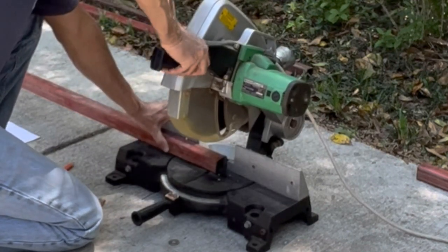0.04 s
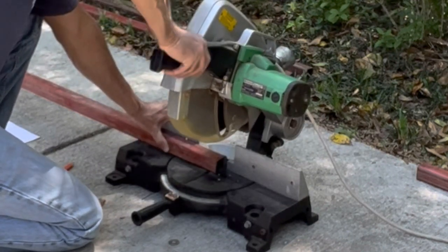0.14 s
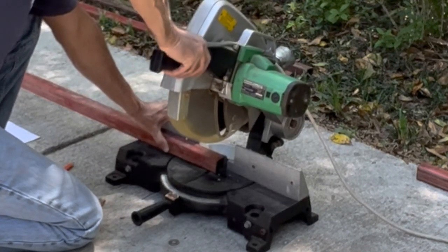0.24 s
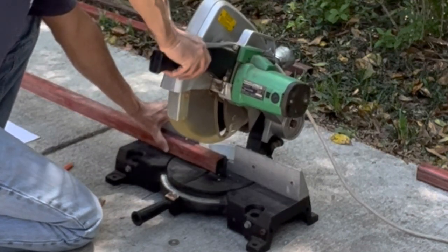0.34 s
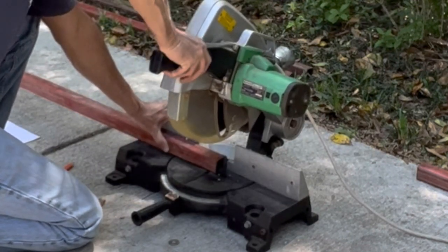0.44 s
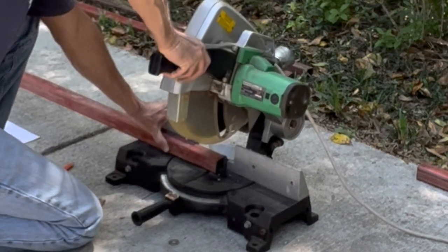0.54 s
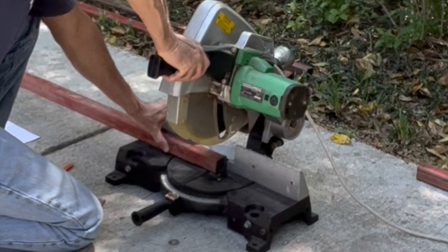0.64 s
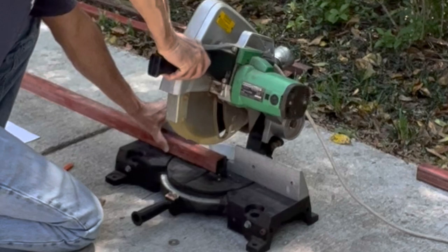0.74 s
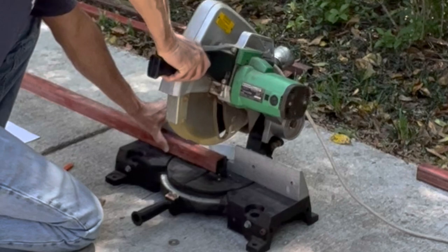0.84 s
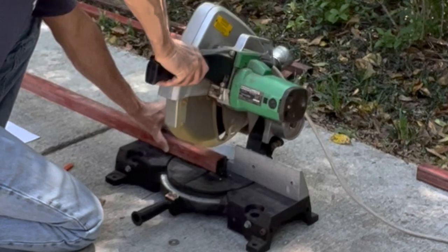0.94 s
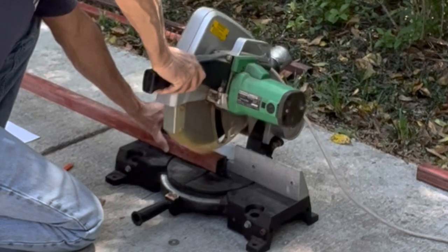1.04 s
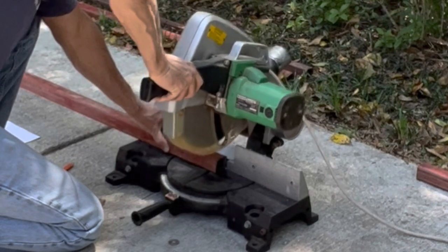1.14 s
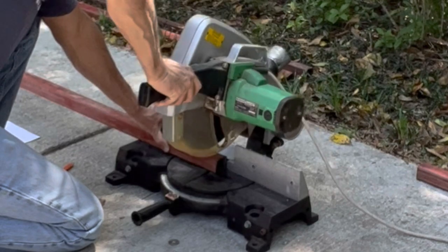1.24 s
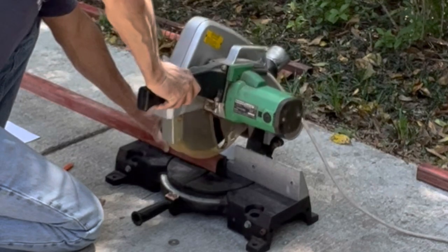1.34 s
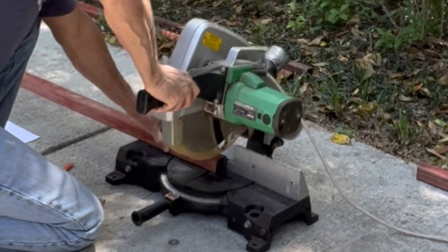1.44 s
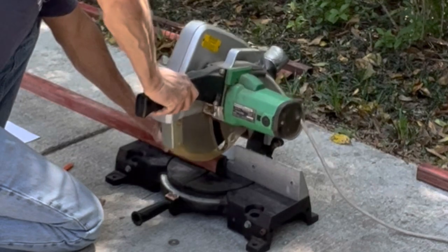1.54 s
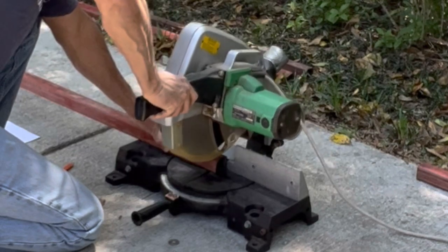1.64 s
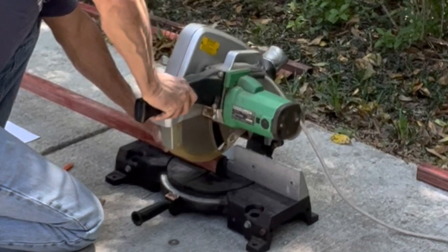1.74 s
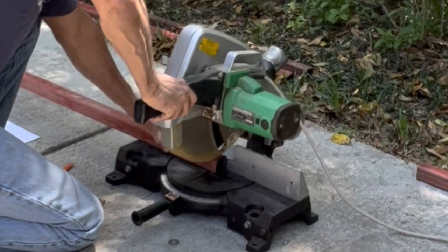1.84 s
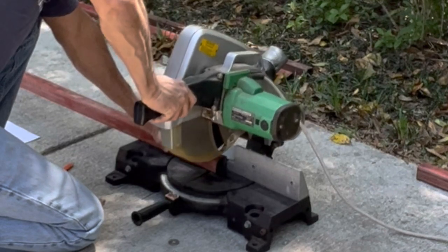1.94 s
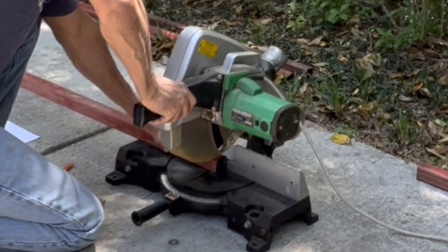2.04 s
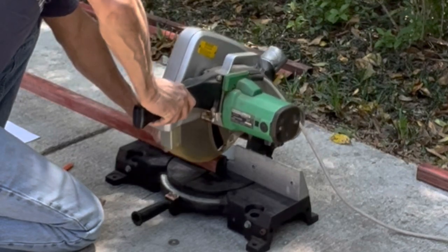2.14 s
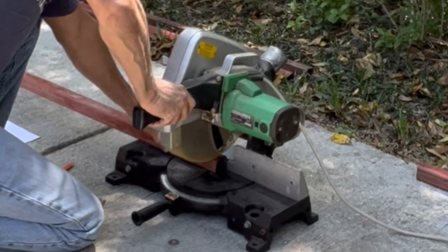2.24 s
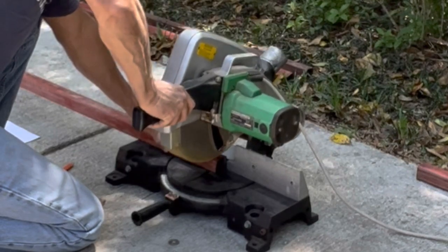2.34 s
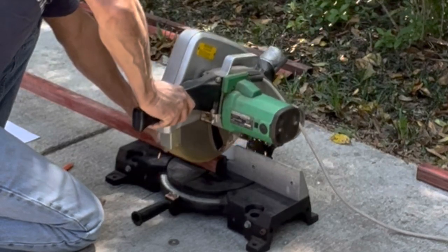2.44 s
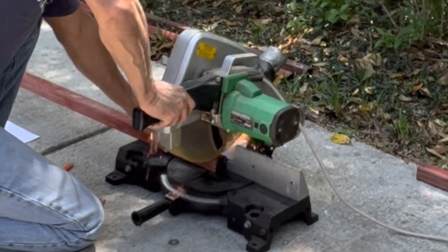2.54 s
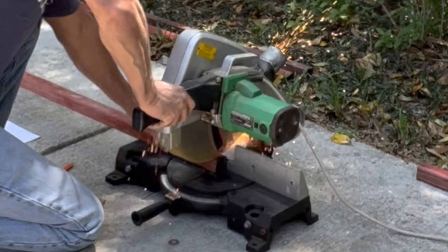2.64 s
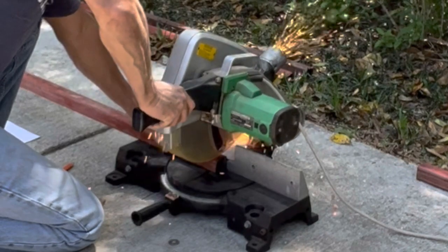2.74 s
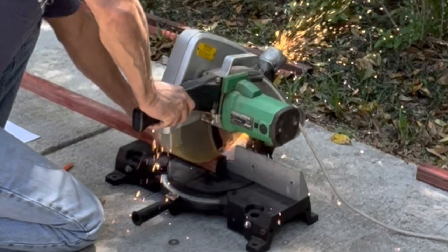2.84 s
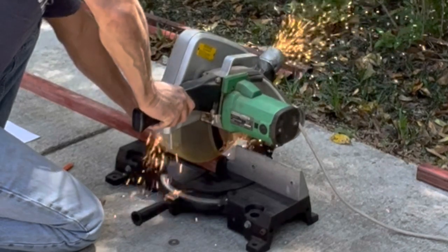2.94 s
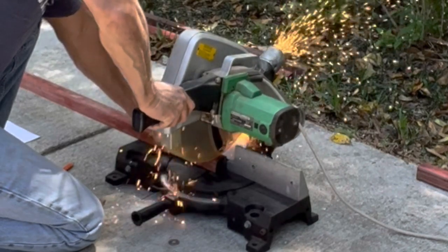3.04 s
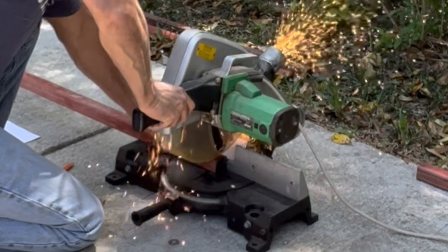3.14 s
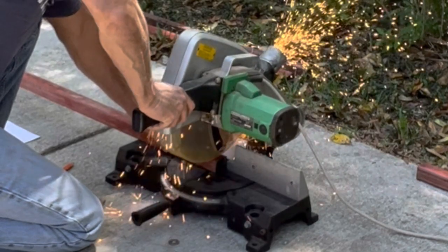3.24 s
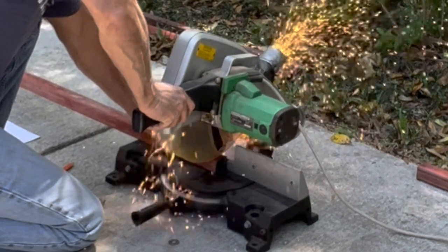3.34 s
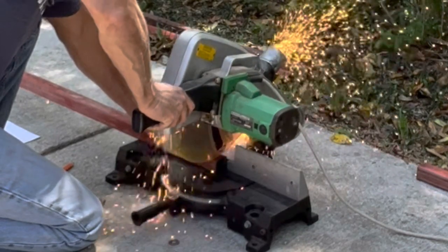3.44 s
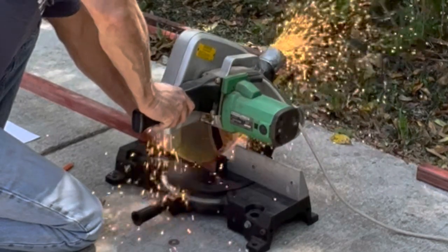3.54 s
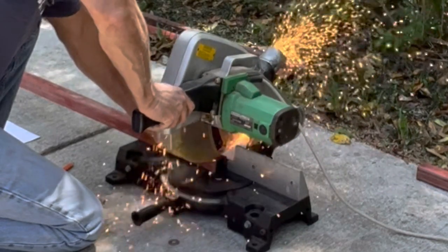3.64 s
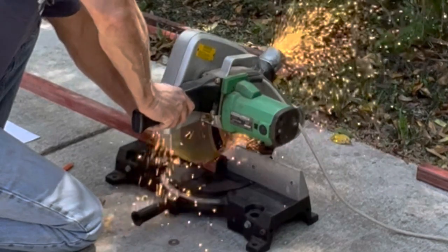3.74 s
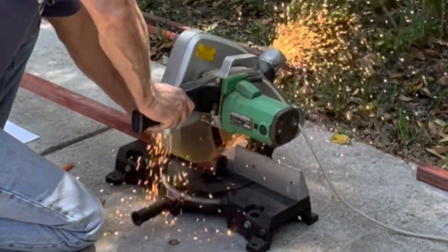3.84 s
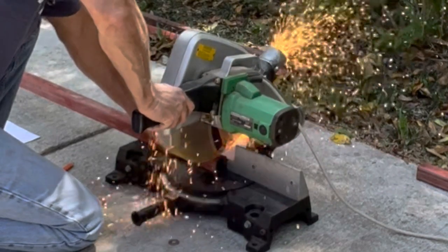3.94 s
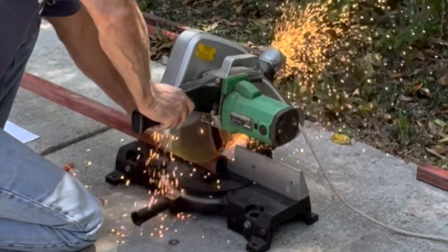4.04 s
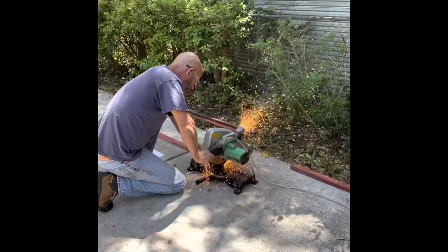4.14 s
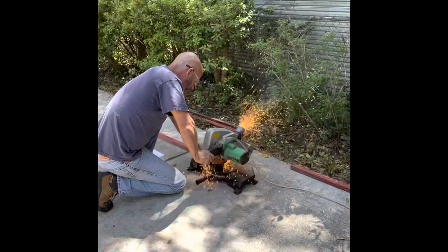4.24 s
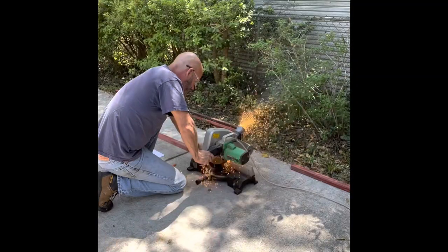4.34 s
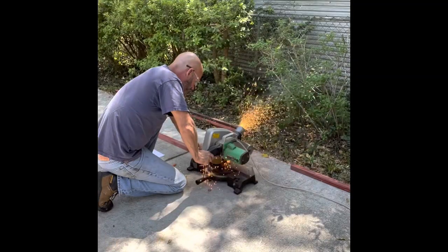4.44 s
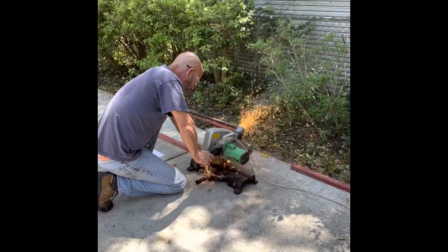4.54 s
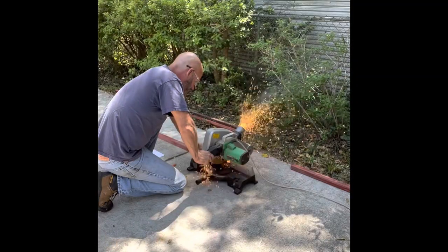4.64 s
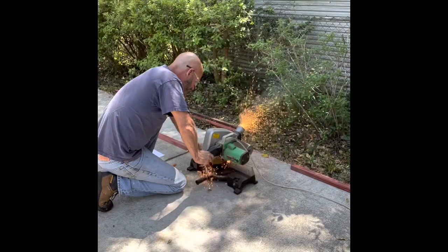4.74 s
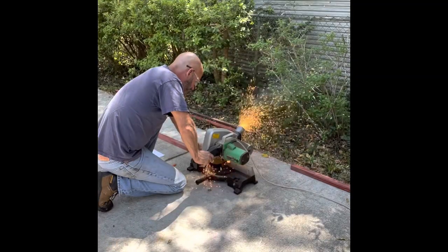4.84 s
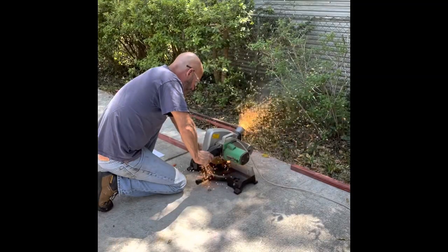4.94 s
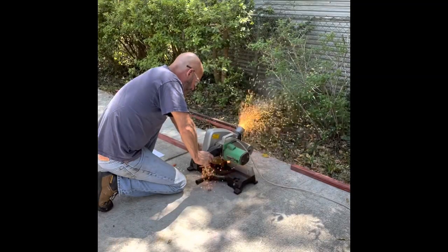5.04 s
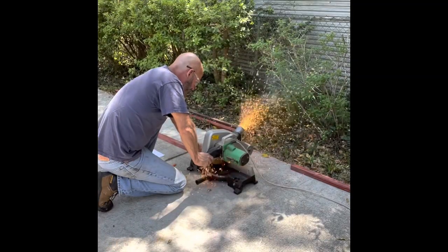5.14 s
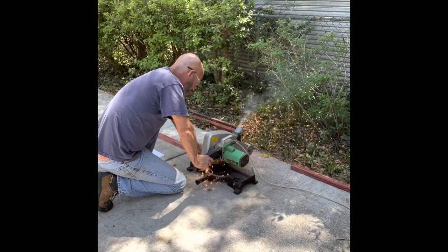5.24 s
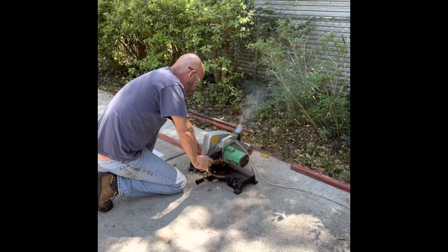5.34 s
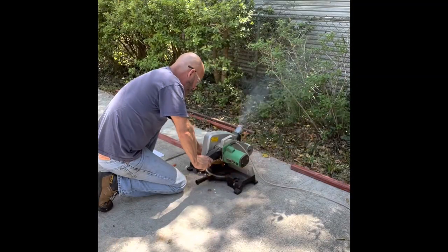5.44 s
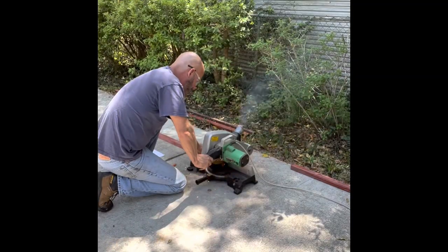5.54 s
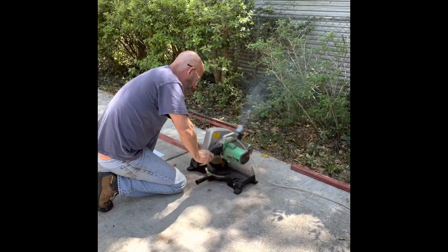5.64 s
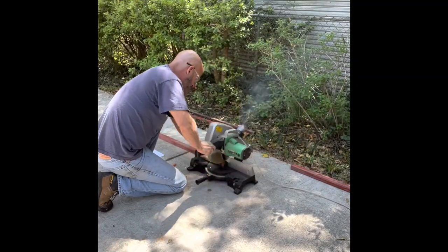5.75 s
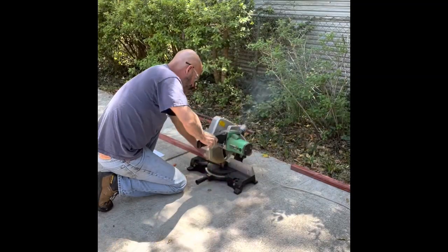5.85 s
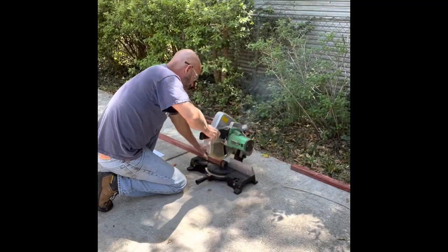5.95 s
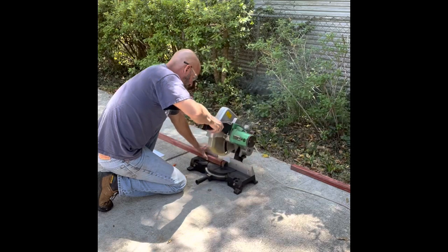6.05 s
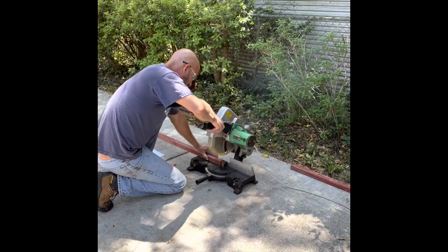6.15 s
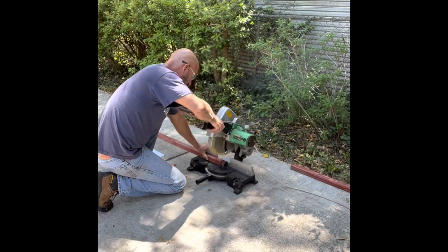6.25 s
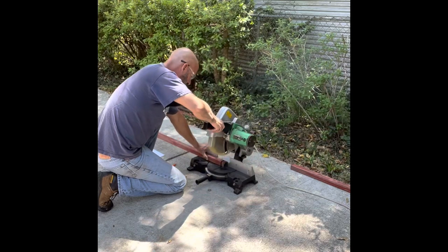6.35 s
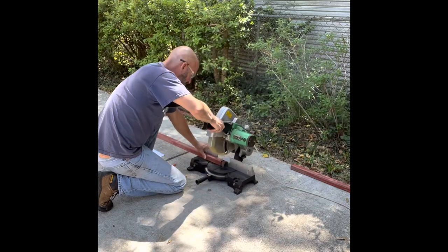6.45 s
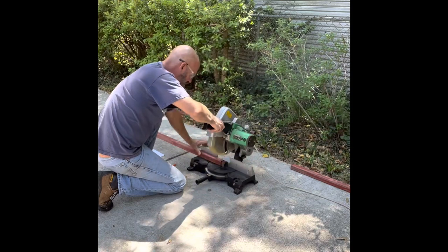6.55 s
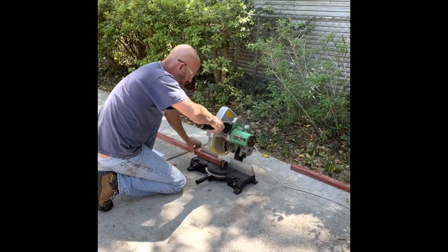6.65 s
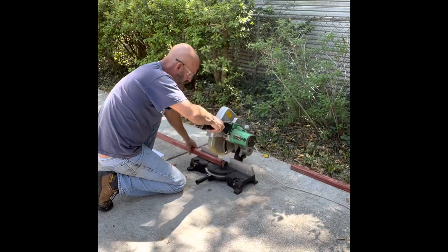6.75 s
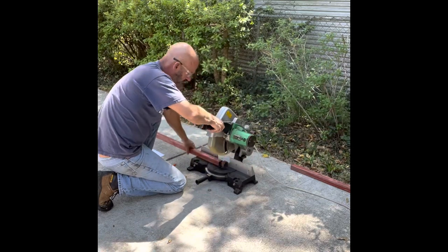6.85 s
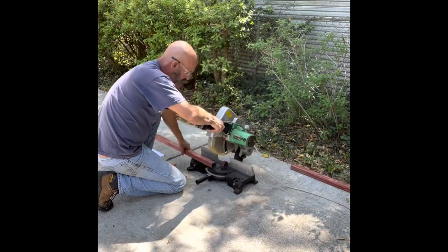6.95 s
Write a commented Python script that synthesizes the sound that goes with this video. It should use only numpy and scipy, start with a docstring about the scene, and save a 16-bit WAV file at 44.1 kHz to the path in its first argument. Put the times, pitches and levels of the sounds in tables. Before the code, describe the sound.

A chop saw clicks, kicks on and winds up to a whine, scrapes a steel tube, bogs into a growling cut, then coasts down rattling.

```python
"""Open-air hush and a far engine's drone over a concrete yard; then, nearer, a chop saw's trigger clicks.
Gears clack and mains current hums as the motor kicks in; its mesh, fan and slots sing, and air roars.
Abrasive grit skims a steel tube and rings it; leaned on, the motor bogs down, growls and sprays sparks.
The wheel breaks through, races, and coasts down with slack gears chattering in a resonant gearbox.
A microphone pair hears the saw and the yard's short answer with phase and level differences."""
import sys
import numpy as np
from scipy import signal
from scipy.fft import rfft, irfft, next_fast_len
from scipy.io import wavfile
from scipy.ndimage import map_coordinates

SR = 44100
rng = np.random.default_rng(int(sys.argv[2]) if len(sys.argv) > 2 else 0)


def master(y):
    """Save y as 16-bit WAV."""
    cut = np.clip(np.atleast_2d(y).T, -1, 1)
    pcm = np.round(cut * 32767)  # scale
    wavfile.write(sys.argv[1], SR, pcm.astype(np.int16))


N = 308655
T = np.arange(N) / SR  # seconds

# far engine and open air: [time_s, drone_db, rumble_db, hush_db]
ENGINE_LEVELS = [(0.6, -57, -58, -49), (1.0, -67, -70, -60), (4.05, -59, -76, -58), (4.2, -56, -45, -56),
                 (5.9, -47, -40.5, -46), (6.7, -37, -47.5, -42.5)]
# spectra of the open-air hush and of the engine's rumble: [pitch_hz, level_db]
HUSH_COLOUR = [(20, -40), (40, -8), (70, -2), (110, -2), (160, -18), (320, -20), (600, -23), (1030, -20),
               (1500, -32), (5400, -57), (12000, -72)]
RUMBLE_COLOUR = [(20, -50), (38, -13), (60, -9), (100, -8.5), (150, -11.5), (216, -16), (400, -34),
                 (880, -90)]
# soft low thuds: [centre_s, half_length_s, level_db], and their spectrum: [pitch_hz, level_db]
THUDS = [(4.27, .035, -41), (5.87, .04, -34)]
THUD_COLOUR = [(20, -25), (45, 0), (62, 0), (110, -22), (400, -70)]
# how long the yard's answer lasts, as time to fall 60 dB: [pitch_hz, t60_s]
YARD_DECAY = [(200, 0.27), (2500, 0.28), (10000, 0.072)]
# sound thrown back by slab and fence: [pitch_hz, level_db]
YARD_ECHO = [(100, -25), (400, -12), (1000, -15.5), (2500, -10.5), (4200, -10), (6500, -2.5), (7500, -8.5),
             (15000, -8)]
# microphone pair, phase by which left leads: [pitch_hz, lead_rad]
PORT_PHASE = [(100, 0), (450, .3), (1000, 0), (1800, -.25), (2250, 0), (2600, -1.8), (4100, -2.1),
              (4700, -3.2), (5500, -5.8), (6300, -5.9), (7000, -3.2), (8400, -3.1), (10500, 0), (13000, 0),
              (14000, 3.1)]
# microphone pair, left minus right: [pitch_hz, difference_db]
PORT_BALANCE = [(150, -1), (400, 1), (700, 4.5), (1100, 4), (1500, 0), (2800, -1), (3500, -0.5),
                (4400, -14), (5100, -5.5), (6000, -7.5), (7200, -7), (8000, -0.5)]
# trigger and its lock, relative levels: [start_s, level_db], and their spectrum: [pitch_hz, level_db]
TRIGGER_CLICKS = [(.218, -22.5), (.241, -42), (.271, -45), (.308, -47), (.403, -27), (.569, -40),
                  (.624, -41)]
CLICK_COLOUR = [(200, -21), (700, -15), (1000, 9), (1700, -7.5), (2750, 5.5), (3150, -9.5), (7000, -17),
                (15000, -29)]
# gear teeth slam at the start, then bounce ever more weakly, relative levels: [start_s, level_db]
GEAR_CLACKS = [(.637, 1), (.660, -1.5), (.677, -4), (.695, -2.5), (.712, -7), (.729, -10), (.746, -8.5),
               (.763, -10.5), (.779, -13), (.797, -18), (.815, -19)]
# wheel guard resonances: [pitch_hz, width_hz, level_db]
GUARD_MODES = [(465, 90, -3), (767, 30, 0), (1017, 45, 4), (1145, 135, 6), (1520, 24, -5), (1766, 130, 1),
               (2660, 57, -14), (3140, 64, -17), (3570, 150, -27)]
# magnetic hum of the starting current, relative levels: [multiple_of_mains, level_db]
INRUSH_ORDERS = [(2, -8.5), (4, -22), (6, -1.5), (8, 2.5)]
# the gearbox rings as a tooth tone crosses one of its resonances: [start_s, pitch_hz, level_db]
GEARBOX_FLARES = [(6.078, 1028, -16), (6.025, 1860, -27), (6.15, 426, -31.5), (6.285, 1826, -35),
                  (6.322, 1140, -26.5), (6.366, 1010, -28), (6.413, 1825, -22.5), (6.484, 401, -30.5),
                  (6.64, 1800, -35)]
# gearbox resonances: [pitch_hz, width_hz, level_db]
GEARBOX_MODES = [(410, 55, -2), (1010, 60, 0), (1830, 75, -1.5), (2800, 110, -6), (3690, 90, -4),
                 (4800, 160, -14), (5400, 89, -16), (6750, 260, -9)]
# tooth overtones that reach the air directly: [pitch_hz, level_db]
WHIRR_COLOUR = [(400, 0), (1200, -1), (2500, -4), (3700, 2), (5200, -2), (6100, -4), (6800, 3), (8000, -9),
                (12000, -23)]
# shake of the out-of-balance wheel, relative levels: [multiple_of_wheel_turns, level_db]
IMBALANCE_ORDERS = [(1, -1), (2, -12.5), (3, -7), (4, -8.5), (5, -10)]
# spectrum of the air churned by fan and wheel: [pitch_hz, level_db]
AIR_COLOUR = [(30, -66), (110, -25.5), (250, -19), (340, -14.5), (440, -5.5), (540, -11.5), (670, -12.5),
              (810, -3), (970, -6), (1170, 0), (1500, -5.5), (2200, -8), (3300, 1), (3900, -6),
              (6600, -8.5), (7500, -12.5), (9500, -10.5), (15500, -21)]
# motor tones of the free motor at each speed: [turns_per_s, gear_mesh_db, fan_whistle_db, slot_whine_db]
MOTOR_TONES = [(20, -63, -78, -80), (34.2, -55, -74, -74), (45.5, -40.5, -59, -77), (117, -35.5, -65, -45),
               (205.2, -31.5, -52, -28.5), (266, -54, -46, -33), (301, -32.5, -39, -36),
               (333, -34.5, -34.5, -37), (394, -27, -30, -53)]
# singing under braking current: [multiple_of_armature_turns, level_db, gone_by_s, fade_s]
BRAKE_TONES = [(9, -39, 6.1, .2), (14, -22, 6.09, .17), (18, -33, 5.92, .17), (28, -39, 6.0, .12),
               (36, -43, 5.95, .04)]
# motor speed as it sags in the light cut, then in the heavy cut: [time_s, armature_turns_per_s]
SKIM_SPEED = [(2.35, 377), (2.5, 369), (2.75, 354), (3.0, 332), (3.2, 314), (3.4, 291), (3.7, 266),
              (4.09, 255)]
BOG_SPEED = [(4.12, 177.9), (4.242, 179.0), (4.752, 179.8), (4.95, 182.6), (5.03, 189)]
# later catches of the wheel that load the motor again: [centre_s, half_length_s, share_of_full_load]
LOAD_CATCHES = [(5.305, 0.062, 0.82), (5.67, 0.1, 0.23)]
# light cut through the top wall, before bedding and layer trims: [time_s, scrape_db, tube_ring_db]
SKIM_LEVELS = [(2.37, -32.5, -33), (2.62, -28.5, -30), (3.05, -25, -26), (3.33, -27.5, -28),
               (3.55, -26, -27), (4.06, -25, -29.5)]
# spectrum of the scrape: [pitch_hz, level_db]
SKIM_COLOUR = [(30, -28), (200, -19.5), (430, 2), (620, -2), (950, 2.5), (1480, -18), (1750, 1.5),
               (2200, -32), (3300, -13), (6300, -7), (9000, -7.5), (11500, -9.5), (12800, -13.5),
               (15500, -19)]
# tube modes, which take turns as the contact travels: [pitch_hz, width_hz, level_db, best_driven_s, reach_s]
TUBE_MODES = [(2817, 89, 3.8, 3.2, 1.1), (3790, 110, 0.5, 2.95, 0.26), (4335, 125, 5, 2.8, .7),
              (5120, 105, 5.5, 3.8, .65), (6150, 126, 0, 3.16, .45), (6530, 140, -4, 2.5, 0.76),
              (7150, 330, -7, 3.8, 1.3)]
# motor vibration that reaches the tube through the wheel: [multiple_of_armature_turns, level_db]
SHAKE_ORDERS = [(12, -20), (14, -28.5), (18, -23)]
# high spots of the rim that tap the top wall, relative levels: [multiple_of_wheel_turns, level_db]
RIM_TAPS = [(7, -11), (13, -1), (14, -5), (15, -6.5), (16, -3), (17, -1), (24, 3), (26, -5.5)]
# resonances of the saw's base: [pitch_hz, width_hz, level_db]
BASE_MODES = [(462, 51, -1), (924, 47, 2), (1088, 31, 2.5), (1310, 21, -3), (1806, 37, -4)]
# spectra of the heavy cut and of the flying sparks: [pitch_hz, level_db]
DEEP_COLOUR = [(30, -25.8), (270, -19.5), (460, -3.5), (620, -11), (910, -0.5), (1250, -15.5), (1700, -7.5),
               (1950, -16), (2550, -10.5), (2950, -11), (6500, -10.5), (10000, -12), (11500, -12.5),
               (15500, -25)]
SPRAY_COLOUR = [(1500, -40), (5000, -6), (8000, -5), (10500, 0), (13000, -1), (15500, -10)]
# lobes worn into the wheel's rim, relative levels: [multiple_of_wheel_turns, level_db]
RIM_LOBES = [(20, -11.5), (24, -10.5), (25, -5.5), (26, -11), (27, 1), (28, -10)]
# the wheel grabs, breaks through and brushes the cut edges: [centre_s, half_length_s, growl_db, spark_db]
GRABS = [(4.839, 0.0078, -18.5, -35), (4.879, 0.012, -14, -35), (5.059, 0.043, -26, -10),
         (5.127, 0.068, -17, -29.5), (5.166, 0.0053, -24, -13), (5.188, .004, -25, -17),
         (5.223, 0.021, -24, -22), (5.293, 0.041, -23, -20.5), (5.57, 0.072, -26, -22.5),
         (5.745, 0.14, -27.5, -25)]

# the operator's moves: trigger pulled, wheel touches, leans on it, breaks through, trigger let go (s)
ON_S, TOUCH_S, LEAN_S, THROUGH_S, OFF_S = 0.63, 2.35, 4.1, 5.08, 5.727
MAINS_HZ = 60
PINION, WHEEL_GEAR, FAN_BLADES, SLOTS = 9, 46, 12, 14  # teeth, teeth, blades, armature slots
# the free motor: speed it climbs towards (turns per s), time to half of it from rest, coast-down time scale
FREE_SPEED, SPIN_UP_S, COAST_S = 416, 0.17, 1.127
THROUGH_SPEED = 203  # armature turns per s as the wheel breaks through
# the first catch slows it a little: turns per s lost, when the sag is deepest, time to recover
CATCH_SAG, CATCH_SAG_S, CATCH_RECOVER_S = 5, 5.36, .08


def amp(db):
    """Decibels to gain."""
    return 10 ** (np.asarray(db) / 20)


def unit(x):
    """Scale to rms 1."""
    return x / np.sqrt(np.mean(x ** 2) + 1e-20)


def along(points, hz):
    """(Hz, value) points read on a log axis."""
    f, v = np.transpose(points)
    return np.interp(np.log(hz + 1), np.log(f + 1), v)


def curves(rows):
    """One value per sample for each column after the time."""
    s, *cols = np.transpose(rows)
    return [np.interp(T, s, c) for c in cols]


def during(start, end, rise, fall):
    """A gate that opens at start and is shut by end."""
    return np.clip((T - start) / rise, 0, 1) * np.clip((end - T) / fall, 0, 1)


def bump(centre_s, half_length_s):
    """A smooth swell that peaks at 1."""
    return np.exp(-((T - centre_s) / half_length_s) ** 2)


def wobble(rate):
    """A smooth random curve, rate knots a second."""
    return map_coordinates(rng.standard_normal(int(N * rate / SR) + 4), [T * rate])


def filtered(x, response):
    """x times a complex response of frequency."""
    m = next_fast_len(N + SR // 2)
    return irfft(rfft(x, m) * response(np.fft.rfftfreq(m, 1 / SR)), m)[..., :N]


def coloured(x, colour):
    """x through a (Hz, dB) spectrum, at rms 1."""
    return unit(filtered(x, lambda hz: amp(along(colour, hz))))


def ringing(x, modes):
    """x through a body's resonances, with alternating signs."""
    def response(f):
        total = 0
        for k, (centre, width, db) in enumerate(modes):
            damping = 1j * f * width
            total = total + (-1) ** k * amp(db) * damping / (centre * centre - f * f + damping)
        return total

    return filtered(x, response)


def halves(x, colour, split_hz):
    """The low and the high part of coloured x, each at rms 1."""
    x = coloured(x, colour)
    low = filtered(x, lambda hz: 1 / (1 + (hz / split_hz) ** 8))
    return unit(low), unit(x - low)


def per_turn(turns, size):
    """A random profile round a rim, met again on every turn."""
    return unit(map_coordinates(rng.standard_normal(size), [turns % 1 * size], order=3, mode="grid-wrap"))


def partials(turns, orders):
    """Sines on multiples of a rotation; 0 dB means rms 1."""
    return np.sqrt(2) * sum(amp(db) * np.sin(2 * np.pi * (round(k) * turns + rng.random())) for k, db in orders)


def bursts(rows, rise, t60):
    """A puff of noise for every (s, dB) contact."""
    envelope = np.zeros(N)
    for s, db in rows:
        age = np.maximum(T - s, 0)
        envelope += amp(db - 60 * age / t60) * (1 - np.exp(-age / rise))
    return envelope * rng.standard_normal(N)


def wide_noise(spread):
    """Noise shared by both sides plus a share of its own on each."""
    return rng.standard_normal(N) + spread * rng.standard_normal((2, N))


def background():
    """Open-air hush, low rumble and the wavering two-partial drone of a far engine."""
    drone_db, rumble_db, hush_db = curves(ENGINE_LEVELS)
    firing_hz = 106 + 1.18 * wobble(7)
    phase = 2 * np.pi * np.cumsum(firing_hz) / SR
    octave = amp(-14.5 + 3.3 * wobble(10)) * np.sin(2 * phase + 0.51 * wobble(21))
    drone = amp(drone_db + 2.5 * wobble(10)) * unit(np.sin(phase) + octave)
    rumble = amp(rumble_db) * coloured(wide_noise(spread=0.49), RUMBLE_COLOUR)
    hush = amp(hush_db) * coloured(wide_noise(spread=0.37), HUSH_COLOUR)
    return drone + rumble + hush


def thuds():
    """Soft low thuds, just after 4.2 s and 5.8 s: swells of low noise."""
    swell = sum(amp(db) * bump(s, length) for s, length, db in THUDS)
    return swell * coloured(wide_noise(spread=.6), THUD_COLOUR)


def yard(x):
    """Slab, fence and bushes scatter a short answer, different on each side and shifting from moment to moment."""
    wet, hop = np.zeros((2, N + SR)), SR // 6
    for centre in range(0, N + hop, hop):
        span = np.arange(max(centre - hop, 0), min(centre + hop, N))
        piece = x[span] * np.cos(np.pi / 2 * (span - centre) / hop)
        # a fresh noise tail whose decay depends on frequency
        hz, t, z = signal.stft(rng.standard_normal((2, SR // 2)), SR, nperseg=256)
        decay = amp(-60 * t / along(YARD_DECAY, hz)[:, None])
        tail = signal.istft(z * decay, SR, nperseg=256)[1]
        answer = signal.fftconvolve(piece[None], tail / np.linalg.norm(tail[0]), axes=1)
        wet[:, span[0]:span[0] + answer.shape[1]] += answer
    return filtered(wet[:, :N], lambda hz: amp(along(YARD_ECHO, hz)))


def ports(x):
    """The microphone pair hears the saw with a phase and level difference."""
    side = np.array([[1], [-1]]) / 2

    def response(hz):
        gain = amp(side * along(PORT_BALANCE, hz))
        even_power = gain / np.sqrt(np.mean(gain ** 2, axis=0))
        return even_power * np.exp(1j * side * along(PORT_PHASE, hz))

    return filtered(x, response)


def trigger():
    """Short plastic clicks: coloured puffs of noise."""
    clicks = bursts(TRIGGER_CLICKS, rise=0.0014, t60=0.018)
    return amp(11.5) * filtered(clicks, lambda hz: amp(along(CLICK_COLOUR, hz)))


def kick():
    """The starting current hums; its jolt bounces the gears, each blow a knock and a crunch that shake the guard."""
    crunch = bursts(GEAR_CLACKS, rise=0.0011, t60=0.022)
    knocks = np.zeros(N)
    for s, db in GEAR_CLACKS:
        knocks[round((s + .001) * SR)] = amp(db)
    hum_db = -27.0 - 76 * np.maximum(T - ON_S, 0)
    hum = amp(hum_db) * during(ON_S, 1.2, 0.034, .1) * partials(MAINS_HZ * T, INRUSH_ORDERS)
    guard = ringing(amp(23) * knocks + amp(12.5) * crunch, GUARD_MODES)
    direct = amp(-22) * filtered(crunch, lambda hz: 1 / (1 + 1j * hz / 7000))
    return hum + guard + direct


def flares():
    """Brief swelling, ragged rings of the gearbox."""
    out = np.zeros(N)
    for s, hz, db in GEARBOX_FLARES:
        age = np.maximum(T - s, 0) / .008  # peaks 8 ms after the start
        out += amp(db) * age * np.exp(1 - age) * np.sin(2 * np.pi * hz * T + 0.39 * wobble(200))
    return out


def coasting(shaft, wheel, speed):
    """Slack teeth knock the gearbox: overtones slide down through its resonances and break up into a rattle."""
    chatter_db, chatter_speed = -33.5, 59  # it dies away below this speed (turns per s)
    fall_db, rattle_speed = .6, 42  # loss per overtone; they lose their pitch below this speed (turns per s)
    teeth = PINION * shaft + .028 * wobble(130)
    overtones = sum(partials(teeth, [(k, -fall_db * k)]) * amp(3 * wobble(40)) for k in range(2, 13))
    # the teeth meet and part once a wheel turn, which breaks the overtones up
    overtones = unit(overtones * amp(2.5 * np.cos(2 * np.pi * wheel)))
    overtones = overtones / np.hypot(1, (rattle_speed / speed) ** 4)
    knocks = overtones * amp(2.5 * wobble(70)) + 1.4 * rng.standard_normal(N)
    box = ringing(knocks, GEARBOX_MODES)
    box = box / np.std(box[T > 6])
    # the whirr flutters, and weakens as the teeth slow
    whirr_db = 8.5 + 3.0 * np.log2(speed / FREE_SPEED) + 2 * wobble(55)
    whirr = amp(whirr_db) * filtered(overtones, lambda hz: amp(along(WHIRR_COLOUR, hz)))
    level = amp(chatter_db) / np.sqrt(1 + (chatter_speed / speed) ** 1.6)
    return level * np.clip((T - OFF_S) / .02, 0, 1) * (box + whirr)


def imbalance(wheel, speed, touch):
    """The wheel's heavy side shakes the saw once a turn, harder at speed and against the tube."""
    # dB at free speed, per doubling of speed, and gained by touching the tube
    level_db = -47.5 + 26.5 * np.log2(speed / FREE_SPEED) + 11 * touch
    return amp(level_db) * during(0.85, LEAN_S, 0.24, 0.45) * partials(wheel, IMBALANCE_ORDERS)


def air(shaft, speed):
    """Fan and wheel churn the air, louder and brighter with speed, rushing at switch-on, fluttering with the turns."""
    def level(free_db, per_doubling_db, rush_db, fade_db_per_s):
        steady = amp(free_db + per_doubling_db * np.log2(speed / FREE_SPEED))
        rush = amp(rush_db - fade_db_per_s * np.abs(T - ON_S))
        return np.hypot(steady, rush)

    flow = rng.standard_normal(N) * amp(1.65 * per_turn(shaft, size=5) + 1.02 * wobble(60))
    roar, treble = halves(flow, AIR_COLOUR, split_hz=2010)
    fizz = filtered(treble, lambda hz: 1 - 1 / (1 + (hz / 4200) ** 12))
    hiss = treble - fizz
    sound = level(free_db=-26.5, per_doubling_db=5.5, rush_db=-17, fade_db_per_s=76) * roar
    sound += level(free_db=-27.5, per_doubling_db=8, rush_db=-27.5, fade_db_per_s=76) * unit(hiss)
    sound += level(free_db=-29, per_doubling_db=6, rush_db=-26, fade_db_per_s=82) * unit(fizz)
    return np.clip((T - ON_S) / 0.014, 0, 1) * sound


def motor_speed():
    """Armature turns per s: the motor races when free, sags in the cut and coasts once switched off."""
    def race(start_s, start_speed):
        age = np.maximum(T - start_s, 0) + SPIN_UP_S * start_speed / (FREE_SPEED - start_speed)
        return FREE_SPEED * age / (age + SPIN_UP_S)

    cutting, = curves([*SKIM_SPEED, *BOG_SPEED, (THROUGH_S, THROUGH_SPEED)])
    spin_up, speed_up = race(ON_S, 1), race(THROUGH_S, THROUGH_SPEED)
    driven = np.select([T < TOUCH_S, T < THROUGH_S], [spin_up, cutting], speed_up)
    driven = driven - CATCH_SAG * bump(CATCH_SAG_S, CATCH_RECOVER_S)
    coast = np.interp(OFF_S, T, driven) / (1 + np.maximum(T - OFF_S, 0) / COAST_S) ** 4
    return np.where(T < OFF_S, driven, coast)


def motor(shaft, speed, touch, load):
    """Gear mesh, fan and armature slots sing; the torque throbs twice per mains cycle, more under load."""
    speeds, mesh_free, fan_free, slot_free = np.transpose(MOTOR_TONES)

    def level_db(free_db, light_db, heavy_db):
        return np.interp(speed, speeds, free_db) + light_db * touch + heavy_db * load

    mesh_db = level_db(mesh_free, light_db=-4, heavy_db=9.5)
    fan_db = level_db(fan_free, light_db=-11, heavy_db=18)
    slot_db = level_db(slot_free, light_db=-3.5, heavy_db=16.5)
    throb = 2 * np.pi * 2 * MAINS_HZ * T
    current = during(ON_S, OFF_S, .01, .01) * (.5 + .5 * during(LEAN_S, 4.95, .02, .3))
    # the big gear's runout sways the tones once a wheel turn
    sway = per_turn(shaft * PINION / WHEEL_GEAR, size=6)

    def tone(teeth, swell, bend, runout, rough):
        phase = 2 * np.pi * teeth * shaft + bend * current * np.sin(throb)
        phase = phase + runout * sway + rough * wobble(260)
        return np.sqrt(2) * (1 + swell * current * np.cos(throb)) * np.sin(phase)

    # teeth rattle in their backlash when unloaded and as the wheel breaks through, which blurs the mesh tone
    slack = np.where(T < OFF_S, 1, .6 * during(OFF_S, 6.15, .001, .3)) * (1 - load)
    slack += .5 * during(5.0, 5.3, .06, .1)
    flutter = amp((T > OFF_S) * (3 * wobble(45) - 2))
    mesh = flutter * tone(PINION, swell=.75, bend=.6, runout=.3, rough=.3 + 1.75 * slack)
    fan = tone(FAN_BLADES, swell=.05, bend=.05, runout=.1, rough=.2)
    slots = tone(SLOTS, swell=.8, bend=.45, runout=.15, rough=.15 + .85 * (1 - load))
    # braking current makes the armature sing as the trigger is let go
    jittery = shaft + 0.0047 * wobble(260)
    brake = sum(during(OFF_S, end_s, 0.0065, fade_s) * partials(jittery, [(k, db)])
                for k, db, end_s, fade_s in BRAKE_TONES)
    brake = brake * amp(2.5 * wobble(40)) * speed / np.interp(OFF_S, T, speed)
    return (T > ON_S) * (amp(mesh_db + 0.5) * mesh + amp(fan_db) * fan + amp(slot_db) * slots + brake)


def grit(wheel, locked, spiky_db, runout_db):
    """Abrasive grains hit steel: some come back each turn, and the wheel's high side bites harder."""
    grains = unit(rng.standard_normal(N) * amp(spiky_db * wobble(1500)))
    return (grains + locked * per_turn(wheel, size=160)) * amp(runout_db * per_turn(wheel, size=7))


def skim(shaft, wheel):
    """The wheel scrapes the top wall and rings the tube; its rim taps slide down through the base's resonances."""
    scrape_db, ring_db = curves(SKIM_LEVELS)
    contact = grit(wheel, locked=0.17, spiky_db=4.0, runout_db=0.5)
    scrape, fizz = halves(contact, SKIM_COLOUR, split_hz=2400)
    drive = grit(wheel, locked=0.065, spiky_db=4.5, runout_db=2.0)
    drive = drive + partials(shaft + 0.0055 * wobble(260), SHAKE_ORDERS)
    ring = np.zeros(N)
    for hz, width, db, best_s, reach_s in TUBE_MODES:
        mode = ringing(drive, [(hz, width, db)]) * amp(1.1 * wobble(8.1))
        ring += mode / np.hypot(1, (T - best_s) / reach_s)
    # the modes drift in pitch, by a share of about .0035, as the kerf opens
    ring = map_coordinates(unit(ring), [np.cumsum(1 + .0035 * wobble(5))], mode="nearest")
    taps = sum(partials(wheel + .004 * wobble(60), [tap]) * amp(3 * wobble(7)) for tap in RIM_TAPS)
    # the scrape builds as the wheel beds in
    bedding_db = -5 * np.exp(-np.abs(T - TOUCH_S) / 0.55)
    sound = amp(scrape_db + bedding_db - 1.5) * scrape
    sound += amp(ring_db - 0.5) * fizz + amp(ring_db + 2.0) * ring
    return during(TOUCH_S, LEAN_S, 0.0055, 0.0092) * (sound + amp(-35) * ringing(taps, BASE_MODES))


def deep_cut(wheel):
    """Buried in the kerf, the wheel growls at its turning rate and sprays sparks; each grab swells both.
    Returns the sound at the wheel and the wide fizz of the flying sparks."""
    buried = during(LEAN_S, 5.12, 0.016, 0.02)
    growl_gain, spark_gain = amp(-25) * buried, amp(-17) * buried
    for s, length, growl_db, spark_db in GRABS:
        swell = bump(s, length)
        growl_gain = np.hypot(growl_gain, amp(growl_db) * swell)
        spark_gain = np.hypot(spark_gain, amp(spark_db) * swell)
    bite = grit(wheel, locked=0.33, spiky_db=1.0, runout_db=1.6)
    bite = bite * amp(0.38 * np.cos(2 * np.pi * 2 * MAINS_HZ * T))
    growl, sparks = halves(bite, DEEP_COLOUR, split_hz=1980)
    lobe_gain = amp(-27.5 + 3.0 * wobble(15)) * during(LEAN_S, 5.12, 0.12, 0.04)
    lobes = lobe_gain * partials(wheel + .003 * wobble(80), RIM_LOBES)
    spray = amp(-13) * spark_gain * coloured(rng.standard_normal((2, N)), SPRAY_COLOUR)
    return lobes + growl_gain * growl + spark_gain * sparks, spray


def scene():
    """The armature's speed and angle drive the saw's turning parts, heard with the yard around it."""
    speed = motor_speed()
    unsteady = .0006 + .001 * during(LEAN_S, OFF_S, .02, .02)
    shaft = np.cumsum(speed * (1 + unsteady * wobble(14))) / SR  # armature turns so far
    wheel = shaft * PINION / WHEEL_GEAR
    touch = during(TOUCH_S, LEAN_S, 0.45, .02)
    load = during(LEAN_S, 5.25, 0.026, 0.17)
    load = load + sum(share * bump(s, length) for s, length, share in LOAD_CATCHES)
    running = air(shaft, speed) + motor(shaft, speed, touch, load) + imbalance(wheel, speed, touch)
    machine = trigger() + kick() + running + coasting(shaft, wheel, speed) + flares()
    cut, spray = deep_cut(wheel)
    saw = machine + skim(shaft, wheel) + cut
    return ports(saw + yard(saw)) + spray + background() + thuds()


def record(dry):
    """The level dips briefly around the start of the heavy cut; nothing is kept above the band limit."""
    dip_s, dip_db, fall_s, recover_s, top_hz = 4.102, -24.5, 0.0075, 0.048, 14300
    level_db = dip_db * np.exp(-np.abs(T - dip_s) / np.where(T < dip_s, fall_s, recover_s))
    return filtered(dry * amp(level_db), lambda hz: hz < top_hz)


dry = scene()
out = record(dry)
master(out)
```